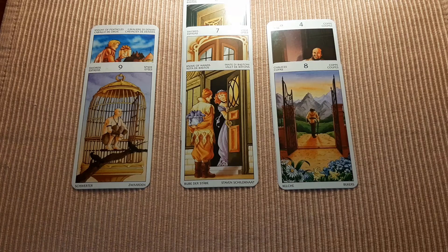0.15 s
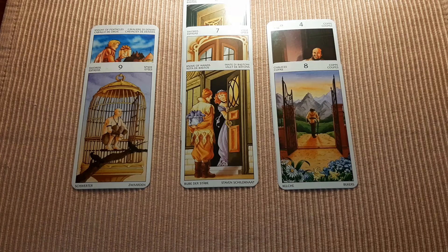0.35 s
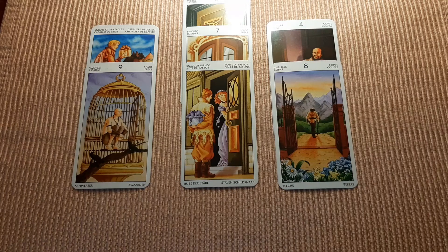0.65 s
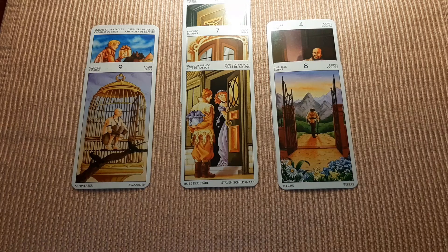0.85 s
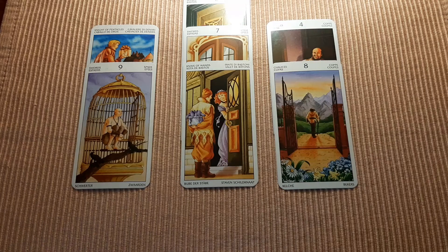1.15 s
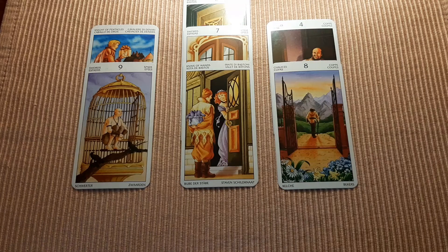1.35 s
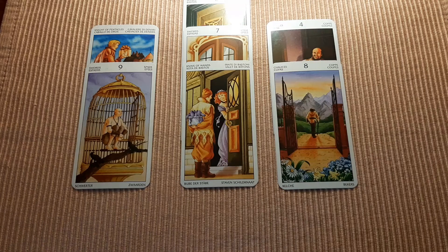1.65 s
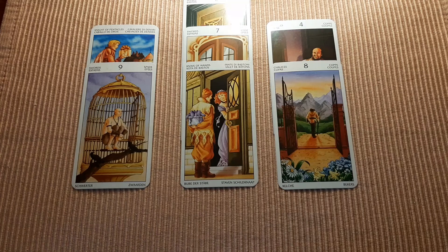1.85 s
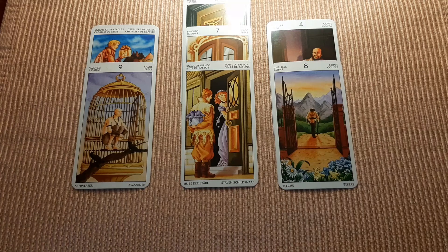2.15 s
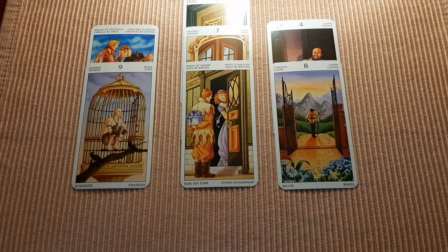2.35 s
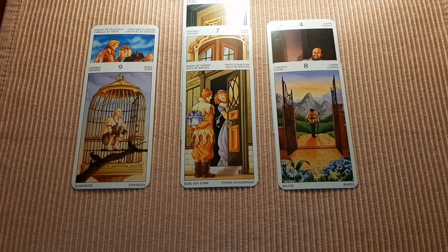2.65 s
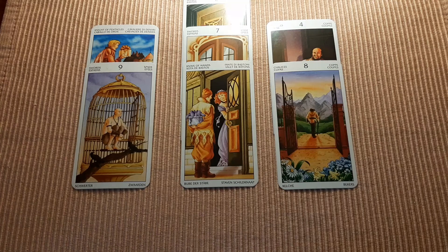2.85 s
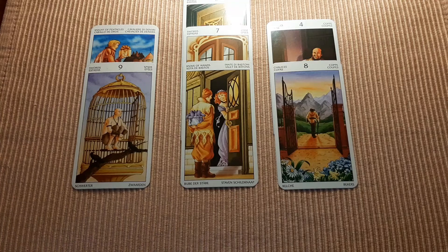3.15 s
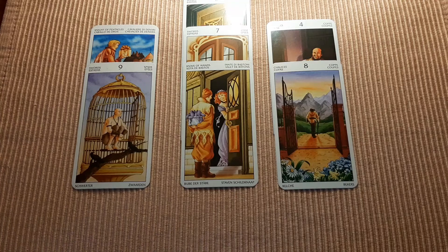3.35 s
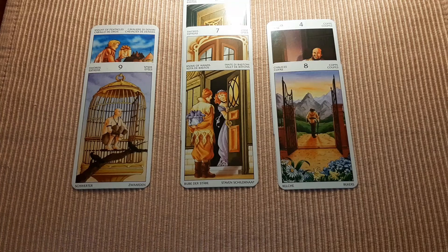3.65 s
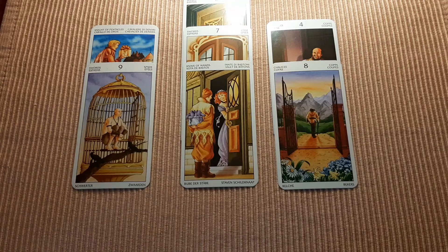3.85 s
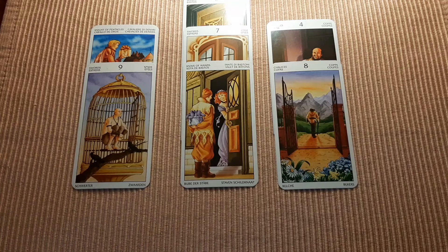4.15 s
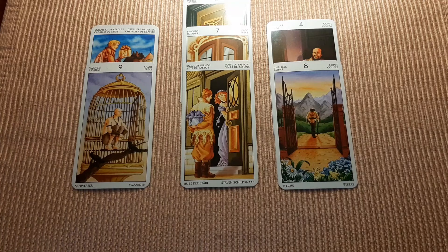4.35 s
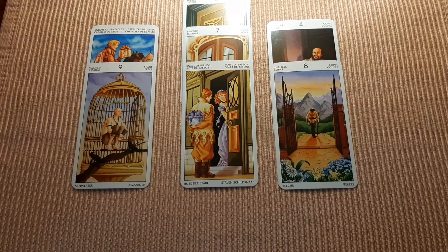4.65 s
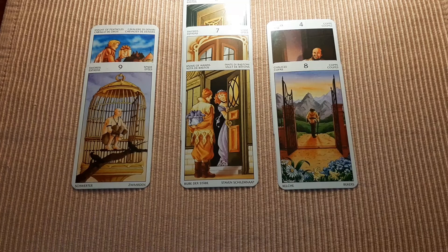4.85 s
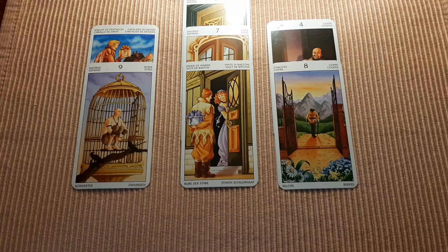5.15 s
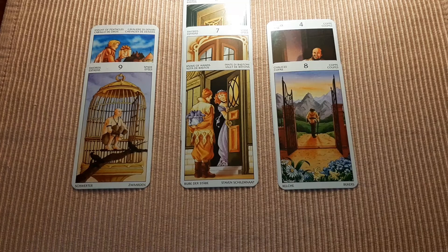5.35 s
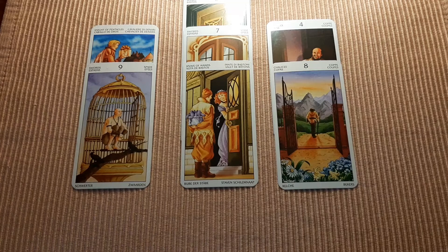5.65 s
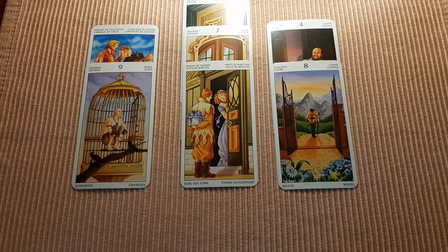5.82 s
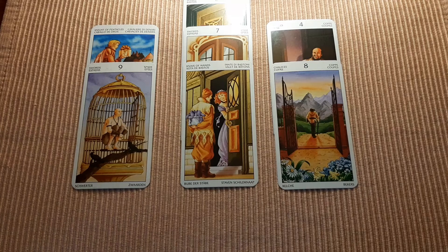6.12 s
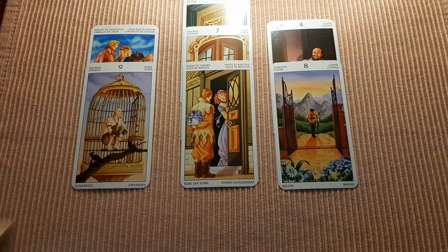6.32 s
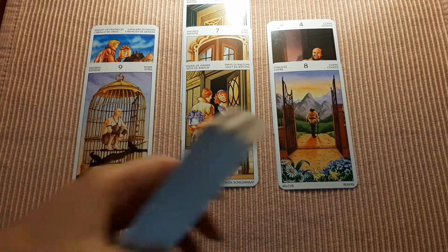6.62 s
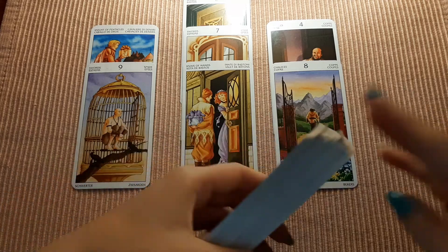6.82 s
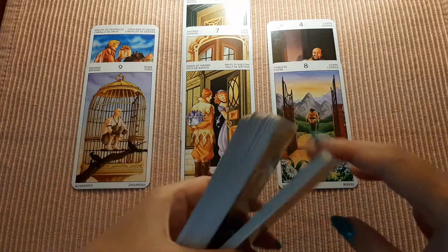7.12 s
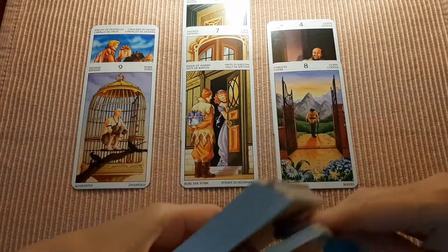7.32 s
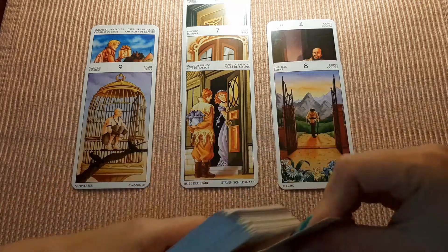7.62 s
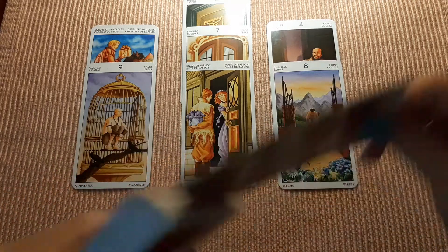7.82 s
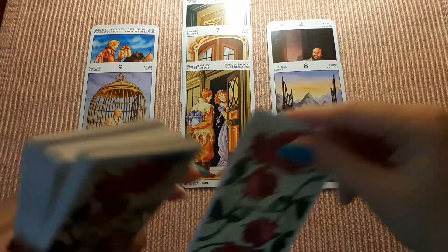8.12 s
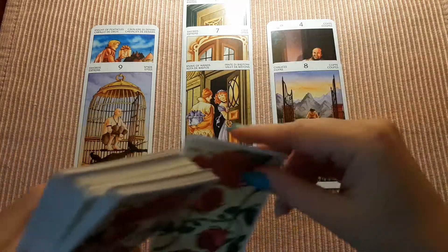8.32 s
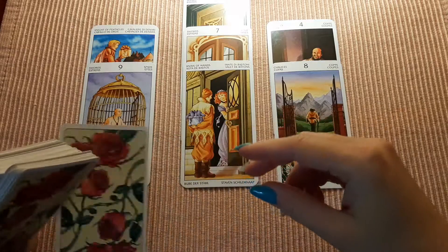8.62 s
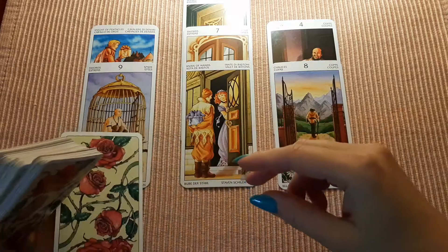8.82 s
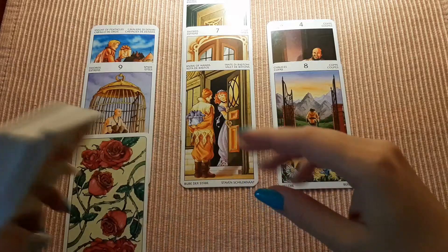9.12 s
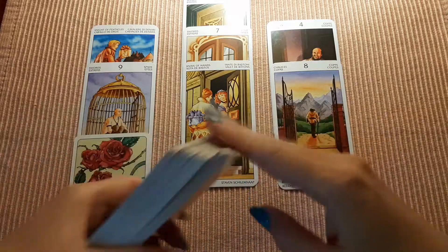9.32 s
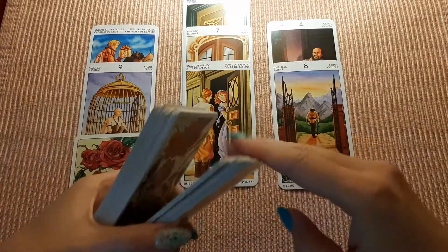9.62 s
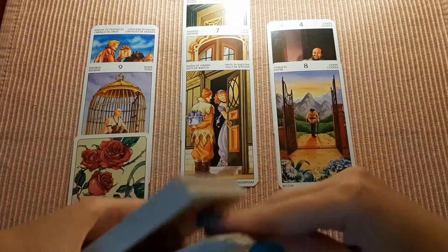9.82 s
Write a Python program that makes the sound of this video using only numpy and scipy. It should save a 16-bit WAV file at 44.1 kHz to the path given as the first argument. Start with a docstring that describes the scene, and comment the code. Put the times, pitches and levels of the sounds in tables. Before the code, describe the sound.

Playing cards shuffled by hand, recorded close and fairly dry indoors. Packets drop with bright cracks and papery scrapes, the deck thumping into the palm; a hard thump leads into a knock and rattle on a wooden table. After a near-silent pause, single cards are drawn and laid on fabric with quiet swishes, small ticks, low handling and a tiny squeak, over faint hiss and far traffic rumble.

```python
"""In a small quiet room with hiss and far traffic rumble, a deck of stiff cards is shuffled overhand: packets
scrape down (enveloped noise), card edges snap (decaying sines and cracks), the deck thumps in the palm (air pulses).
It is rapped on a wooden table, faintly and then, near 4 s, hard (modal ringing with clattering noise).
Then single cards are drawn and slid onto cloth (clumped noise strokes) with soft low handling (enveloped noise);
a faint whine (narrow-band noise) sinks in pitch from about 7 to 9 s, and a small squeak (sines) comes near 8.2 s."""
import sys
import numpy as np
from scipy import signal
from scipy.fft import rfft, irfft, next_fast_len
from scipy.io import wavfile
from scipy.ndimage import uniform_filter1d, map_coordinates

SR = 44100
rng = np.random.default_rng(int(sys.argv[2]) if len(sys.argv) > 2 else 0)


def inscribe(sig):
    """Save sig as 16-bit PCM at rate SR to the path in sys.argv[1].

    A 1-D sig is mono; a 2-D sig holds one channel per row.
    Samples are clipped to [-1, 1] before scaling.
    """
    pcm = np.round(np.clip(np.atleast_2d(sig).T, -1, 1) * 32767)
    wavfile.write(sys.argv[1], SR, pcm.astype(np.int16))


def rack_gain(trim_db):
    """Turn a fader trim in dB into the linear factor to multiply a signal by."""
    fader = np.asarray(trim_db, float)
    return 10 ** (fader / 20)


N = 439677  # samples

# Spectrum of the steady room and microphone hush. Each row: frequency in Hz, relative density in dB.
HUSH_SPECTRUM = [(18, -36), (30, -6), (86, -3.5), (109, -7.5), (199, -6.5), (415, -11.5), (486, -15),
                 (684, -13.5), (1320, -20), (1500, -19.5), (2480, -22.5), (4300, -19.5), (16000, -23.5)]
# Slow course of the far traffic. Each row: time in seconds, level in dB.
TRAFFIC_LEVEL = [(0, -70), (1.5, -69.5), (1.8, -73.5), (2.7, -66), (4.6, -65.5), (5.9, -68.5), (6.5, -67),
                 (8.3, -64), (9.97, -66.5)]
# Spectrum of the far traffic. Each row: frequency in Hz, relative density in dB.
TRAFFIC_SPECTRUM = [(24, -37.5), (40, 3.5), (221, -1), (298, -5), (504, -8.5), (615, -7.5), (1200, -21),
                    (1560, -60), (2640, -120)]
# Course of the whine. Each row: time in seconds, centre pitch in Hz, central level in dB.
WHINE_COURSE = [(7.45, 735, -76), (7.68, 705, -70.5), (8.08, 685, -72), (8.5, 645, -73), (9.15, 595, -75)]
# Strokes of the hand sliding cards over each other and the cloth. Each row: peak time in seconds, level in dB,
# treble over that level in dB, swell in seconds, fade in seconds.
HAND_STROKES = [(.36, -68, 3.5, 0.12, 0.22), (.51, -59.5, -13, 0.14, 0.075), (.68, -61, 3.5, 0.11, 0.047),
                (.87, -63.5, -21, 0.17, 0.14), (1.5, -61.5, -21, 0.016, 0.095),
                (1.555, -48, 0, 0.0046, 0.027), (1.857, -63, -2, 0.079, 0.11),
                (2.29, -71, -16, 0.22, 0.081), (2.51, -62, -12, 0.057, 0.058), (2.703, -56, -2, 0.036, .01),
                (3.055, -59.5, -1.5, 0.076, 0.069), (3.35, -61, -6, 0.12, 0.2),
                (3.51, -55.5, -7, 0.069, 0.087), (3.555, -57.5, 9, 0.019, 0.019),
                (4.085, -59.5, -1, 0.12, 0.045), (4.18, -59, 4, 0.067, 0.044), (4.5, -62, -11, 0.034, 0.12),
                (4.572, -60, 6, 0.034, 0.036), (5.489, -56, -11, 0.013, 0.064),
                (6.55, -67.5, -5, 0.049, 0.64), (6.94, -60, -12, 0.086, 0.071),
                (7.18, -64, -0.5, 0.17, 0.15), (7.3, -61.5, -4.5, .04, 0.037),
                (7.46, -59.5, 1.5, 0.085, 0.031), (7.544, -48, -6.5, 0.067, 0.018),
                (7.7, -65.5, -11, 0.17, 0.13), (8.3, -68.5, -15, 0.68, 1), (8.51, -58, -18, 0.011, 0.058),
                (9.03, -67, -0.5, 0.037, 0.031), (9.16, -55, -11, 0.027, 0.1), (9.47, -62, -9, 0.14, 0.21),
                (9.68, -54.5, -2.5, 0.036, 0.057), (9.77, -65, 4.5, 0.095, 0.075),
                (9.96, -56.5, -2, 0.1, .1)]
# Spectrum of sliding paper. Each row: frequency in Hz, relative density in dB.
SLIDE_SPECTRUM = [(500, -37), (1000, -6), (2100, -4.5), (2500, -4.5), (2900, -4.5), (4000, -4),
                  (6000, -10.5), (9000, -40.5)]
# Spectrum of the bright card varnish. Each row: frequency in Hz, relative density in dB.
VARNISH_SPECTRUM = [(3000, -36.5), (5500, -2), (8000, 0), (11000, -1.5), (13000, -11.5), (16000, -26.5)]
# Deck squared against the palm. Each row: peak time in seconds, peak level in dB, initial pitch in Hz.
PALM_THUMPS = [(0.156, -36.5, 340), (0.215, -34.5, 277), (0.9426, -23.5, 430), (0.954, -24, 406),
               (1.302, -40.5, 393), (1.568, -38.5, 403), (1.279, -35, 455), (1.378, -39, 397),
               (1.653, -43, 351), (2.384, -36, 405), (2.473, -34, 394), (2.656, -44.5, 620),
               (2.712, -19, 722), (2.7679, -15.5, 570), (3.819, -18.5, 712), (3.8818, -12, 606),
               (7.404, -47, 156), (7.403, -44.5, 440), (7.92, -41.5, 430)]
# Deck rapped on the table. Each row: start in seconds, table level in dB, clatter level in dB,
# clack level in dB, clack pitch in Hz.
TABLE_RAPS = [(1.9858, -52, -51.5, -44.5, 720), (4.0955, -20.5, -30.5, -19.5, 919),
              (4.1839, -35.5, -47, -27, 1560), (4.191, -35, -34, -22.5, 2410),
              (4.219, -46, -38, -22.5, 2330), (4.2693, -47, -32.5, -33, 1200), (4.285, -45, -33, -31, 1290),
              (4.3255, -33.5, -29, -27.5, 810), (4.332, -41, -38, -24, 2440)]
# Modes of the table top. Each row: frequency in Hz, level over the rap in dB, 60 dB decay time in seconds.
TABLE_MODES = [(131, -11, 0.28), (212, -12.5, 0.24), (323.4, -2, 0.19), (382, -4.5, 0.083),
               (538, -8.5, 0.09), (707, 2.5, 0.07), (811, 3.5, 0.055), (982, -12, 0.12),
               (1240, -9.5, 0.098), (1738, -7, 0.045), (2230, -11.5, 0.049), (2477, -17, 0.06)]
# Spectrum of loose cards clattering on wood. Each row: frequency in Hz, relative density in dB.
CLATTER_SPECTRUM = [(530, -9), (900, -12), (1030, -4), (1460, 1.5), (1820, -3.5), (2390, -2.5), (3640, -13),
                    (4580, -18), (5000, -19), (6000, -32), (7800, -47), (13200, -120)]
# Packets scraping into the deck and, after 5 s, soft low handling of cards. Each row: start in seconds,
# level in dB, treble over it in dB, body over it in dB, length in seconds.
DROPS_AND_HANDLING = [(0.141, -41, 8, -6, 0.014), (0.196, -55.5, -16, 11.5, 0.019),
                      (0.58, -48.5, 4.5, -21, 0.058), (0.735, -56.5, 4, -3, 0.0097),
                      (0.78, -57, 1, -29, 0.032), (0.9415, -30.5, -6, -6.5, 0.105),
                      (1.274, -41.5, 4.5, 0.5, 0.03), (1.5636, -38, -1.5, -0.5, 0.077),
                      (2.079, -53.5, 5.5, -7, 0.012), (2.377, -39, 4.5, -5.5, 0.028),
                      (2.7064, -31.5, 1, -8, 0.022), (3.8136, -29, -2.5, -12, 0.04),
                      (5.487, -60, -12, 5, 0.018), (6.494, -60.5, -16, 0, 0.05),
                      (6.919, -57.5, -11, -5, 0.018), (7.394, -59, -2.5, 2.5, 0.1),
                      (7.871, -67, -18, 9.5, 0.04), (8.132, -71, -17.5, 12, 0.07),
                      (8.183, -59, -25.5, 2, 0.14), (8.5, -57, -12, -0.5, 0.02),
                      (9.154, -52, -2, -16, 0.016), (9.494, -58, -20, 3, 0.06)]
# Spectrum of card scraping on card. Each row: frequency in Hz, relative density in dB.
SCRAPE_SPECTRUM = [(530, -35), (900, -10.5), (1170, -5.5), (1510, -3.5), (2350, -3), (2650, -2.5),
                   (4440, -5.5), (7000, -14.5), (9100, -42.5), (15400, -120)]
# Spectrum of flexing cards. Each row: frequency in Hz, relative density in dB.
FLEX_SPECTRUM = [(60, -23.5), (150, -1.5), (300, -2.5), (600, -2.5), (900, -8), (1500, -42.5)]
# Card edges snapping, and a small squeak near 8.2 s. Each row: start in seconds, level in dB, ring pitch in Hz,
# bright crack over that level in dB.
SNAPS_AND_SQUEAK = [(0.1382, -34, 4570, -6), (0.1498, -22.5, 1740, -5.5), (0.1565, -23, 2000, -10.5),
                    (0.1605, -23, 2100, -27), (0.1852, -28, 6500, -7), (0.2017, -19, 2120, -11.5),
                    (0.2132, -28, 2700, -20), (0.5791, -30.5, 3100, -26.5), (0.6578, -35, 2300, -9),
                    (0.7384, -31.5, 3180, -10), (0.9416, 0, 1555, -16), (0.9415, -2.5, 4950, -17),
                    (0.9525, -9.5, 1990, -20.5), (0.9702, -25, 2490, -16.5), (0.9774, -24, 1510, -8.5),
                    (0.9828, -23.5, 1600, -13.5), (0.9914, -18.5, 1820, -9), (0.9938, -25.5, 1710, -22.5),
                    (1.0295, -33.5, 2000, -8), (1.2698, -35, 2050, -2), (1.2768, -21.5, 1460, -3.5),
                    (1.291, -29, 1520, -12), (1.298, -16, 1690, -14), (1.3179, -26, 2000, -18),
                    (1.3388, -35, 4700, -8), (1.3466, -26, 1460, -22), (1.5533, -24.5, 1510, -19),
                    (1.5653, -18, 5000, -5.5), (1.5683, -10.5, 5130, -13), (1.5855, -26, 2230, -17),
                    (1.5895, -22.5, 2290, -6.5), (1.6044, -25.5, 4220, -4), (1.6177, -20, 4950, -17),
                    (1.6232, -23, 2170, -12.5), (1.6255, -26.5, 2180, -12), (2.0748, -37.5, 2750, -12),
                    (2.0825, -34, 4550, -8), (2.1077, -32.5, 2380, -19), (2.3739, -29.5, 1550, -16),
                    (2.3788, -14.5, 2900, -14), (2.3989, -22, 1940, -26), (2.4129, -33.5, 1900, -16),
                    (2.4435, -37, 1160, -17), (2.4477, -31.5, 1450, -10), (2.7096, -13, 2000, -9.5),
                    (2.7118, -10, 2130, -18.5), (2.7175, -19, 1680, -14.5), (2.727, -19, 2100, -13),
                    (2.7668, -24.5, 3100, 0), (3.055, -33.5, 3370, -21), (3.5674, -37.5, 2460, -6),
                    (3.8176, -4.5, 2670, -25), (3.8285, -22.5, 2980, -21.5), (3.834, -19, 2000, -15),
                    (3.8465, -20, 2820, -11.5), (3.8808, -27.5, 2770, 2), (5.4861, -43.5, 1170, 2.5),
                    (6.9296, -29, 2200, -12), (6.973, -38, 2000, -21), (7.025, -45, 2200, -24.5),
                    (7.527, -34, 1210, -17), (7.5375, -34, 4200, -13), (7.547, -36.5, 1240, -25),
                    (7.6256, -35.5, 1340, -14), (7.635, -35.5, 1430, -19), (7.9195, -35, 2770, -17),
                    (8.19, -37.5, 3350, -29.5), (8.212, -48, 3350, -30), (8.272, -42, 1940, -20),
                    (8.4416, -34, 2800, -17), (8.5075, -27, 2460, -12.5), (8.6098, -32, 4770, -15),
                    (9.0238, -38.5, 3500, -7), (9.1581, -28.5, 2120, -27), (9.4694, -33, 3020, -18),
                    (9.5155, -37.5, 1240, -29), (9.6786, -41, 1460, -25), (9.9359, -35.5, 2560, -11)]
# Reverberation of the room. Each row: frequency in Hz, 60 dB decay time in seconds.
ROOM_DECAY = [(150, 0.14), (1000, 0.33), (4000, 0.23), (12000, 0.028)]
# Early reflections. Each row: delay in seconds, level in dB before the source's own offset.
WALL_ECHOES = [(.0078, -25.5), (0.013, -18), (0.0216, -22.5)]

SAG_T60_S = 0.2  # a scrape sags at this rate, slower when it is long


def unit(x):
    """Normalisation: scales x to rms 1."""
    return x / np.sqrt(np.mean(x ** 2) + 1e-20)


def along(points, hz):
    """Logarithmic frequency scale: interpolates (Hz, value) points at hz."""
    f, v = np.transpose(points)
    return np.interp(np.log(hz + 1), np.log(f + 1), v)


def curves(rows):
    """Linear interpolation: one value per sample for each column after the time."""
    s, *columns = np.transpose(rows)
    return [np.interp(np.arange(N) / SR, s, column) for column in columns]


def wobble(rate):
    """Band-limited fluctuation: a smooth random curve with rate knots a second."""
    knots = rng.standard_normal(int(N * rate / SR) + 4)
    return map_coordinates(knots, [np.arange(N) * rate / SR])


def noise(spectrum, patchy_db, grit_db):
    """Filtered noise of rms 1, patchy in time and frequency, with millisecond grit."""
    z = signal.stft(rng.standard_normal(N + 512), nperseg=256)[2]
    field = uniform_filter1d(rng.standard_normal(z.shape), 3, 0)
    field = unit(uniform_filter1d(field, 24, 1))
    patchy = signal.istft(z * rack_gain(patchy_db * field), nperseg=256)[1][:N]
    gritty = patchy * rack_gain(grit_db * wobble(700))
    m = next_fast_len(N)
    response = rack_gain(along(spectrum, np.fft.rfftfreq(m, 1 / SR)))
    return unit(irfft(rfft(gritty, m) * response, m)[:N])


def decay(t, t60):
    """Exponential damping: falls 60 dB in t60 seconds."""
    return rack_gain(-60 * t / t60)


def add(out, s, sound):
    """Superposition: mixes a short sound in at s seconds."""
    part = out[round(s * SR):][:len(sound)]
    part += sound[:len(part)]


def whine():
    """Narrow-band noise: two random quadrature amplitudes on a sinking carrier give a hoarse, broken tone."""
    hz, db = curves(WHINE_COURSE)
    first, last = WHINE_COURSE[0][0], WHINE_COURSE[-1][0]
    on = np.interp(np.arange(N) / SR, [first - 0.2, first, last, last + 0.11], [0, 1, 1, 0])
    phase = 2 * np.pi * np.cumsum(hz + 15 * wobble(9)) / SR  # the pitch wavers
    level = on * rack_gain(db + 5 * wobble(10))
    return level * (wobble(90) * np.sin(phase) + wobble(90) * np.cos(phase))


def background():
    """Incoherent ambient sources: steady hush, slowly moving traffic noise and the whine."""
    hush = rack_gain(-63) * noise(HUSH_SPECTRUM, patchy_db=-0.97, grit_db=0.5)
    rumble = rack_gain(curves(TRAFFIC_LEVEL)[0]) * noise(TRAFFIC_SPECTRUM, patchy_db=1.5, grit_db=0.5)
    return hush + rumble + whine()


def slides():
    """Sliding friction: clumped noise under each stroke of the hand and around every drop or soft handling."""
    swell_db, rest_db = 12, -76  # rise or fall over one swell or fade time; hands at rest
    t = np.arange(N) / SR
    # cards slide in ahead of each drop or handling
    leads = [(s, min(-66, db - 14.5), 0, 0.12, 0.1) for s, db, *_ in DROPS_AND_HANDLING]
    low, top = np.full((2, N), rack_gain(rest_db))
    for s, db, treble_db, swell, fade in HAND_STROKES + leads:
        stroke = rack_gain(db - swell_db * np.maximum((s - t) / swell, (t - s) / fade))
        low = np.hypot(low, stroke)
        top = np.hypot(top, stroke * rack_gain(treble_db))
    clumps = unit(rack_gain(1.2 * wobble(45) + 1.5 * wobble(250)))
    rustle = low * noise(SLIDE_SPECTRUM, patchy_db=3.5, grit_db=-1.0)
    sheen = top * noise(VARNISH_SPECTRUM, patchy_db=1.5, grit_db=-1.5)
    return clumps * (rustle + sheen)


def thumps():
    """Volume displacement: soft contact gives a strong push of air, a weaker, slower pull and a low rough ring."""
    palm_db, palm_pitch, palm_t60_s = -18, 0.6, 0.17  # hollow of the hand: over the push, share of its pitch
    out, ring = np.zeros((2, N))
    t = np.arange(-SR // 50, SR // 8) / SR
    late = np.maximum(t, 0)
    for s, db, hz in PALM_THUMPS:
        swing = np.cos(2 * np.pi * hz * t / (1 + 0.23 * hz * late))  # slows after the peak
        push = swing * np.exp(-(t * hz / np.where(t < 0, 0.3, 1.05)) ** 2)
        hollow = np.sin(2 * np.pi * palm_pitch * hz * late) * decay(late, palm_t60_s)
        add(out, s + t[0], rack_gain(db) * push)
        add(ring, s + t[0], rack_gain(db + palm_db) * hollow)
    return out + ring * wobble(160)


def raps():
    """Modal excitation: every rap clacks, rings the table modes roughly and sets the loose cards clattering."""
    swell_cycles = 1.6  # time constant of each mode's build-up
    boom_db, rattle_db = -14.5, -22  # deck's own flex over the table; bright rattle over the clatter
    wood, shake, boom = np.zeros((3, N))
    t = np.arange(SR // 3) / SR
    rise = 1 - np.exp(-t / 0.001)
    for s, db, clatter_db, clack_db, clack_hz in TABLE_RAPS:
        for hz, mode_db, t60 in TABLE_MODES:
            drift = np.cumsum(rng.standard_normal(len(t))) * 0.04  # cloth and hands blur each mode
            strength = rack_gain(db + mode_db + rng.normal(0, 0.68))  # new at every rap
            envelope = (1 - np.exp(-t * hz / swell_cycles)) * decay(t, t60)
            add(wood, s, strength * envelope * np.sin(2 * np.pi * hz * t + drift))
        clack = rise * decay(t, 36 / clack_hz) * np.sin(2 * np.pi * clack_hz * t)
        add(wood, s, rack_gain(clack_db) * clack)
        add(shake, s, rack_gain(clatter_db) * rise * (decay(t, 0.031) + 0.23 * decay(t, 0.19)))
        add(boom, s, rack_gain(db + boom_db) * rise * decay(t, 0.13))
    clatter = noise(CLATTER_SPECTRUM, patchy_db=1.5, grit_db=3.0)
    rattle = rack_gain(rattle_db) * noise(VARNISH_SPECTRUM, patchy_db=-4.5, grit_db=-0.5)
    return wood + shake * (clatter + rattle) + boom * noise(FLEX_SPECTRUM, patchy_db=1.0, grit_db=1.0)


def drops_and_handling():
    """Friction noise: dropped packets, and later soft low handling, start fast, sag for a while and fade."""
    sheen_sag_t60_s, sag_per_length, fade_t60_s = 0.17, 1.5, 0.13
    t = np.arange(SR // 3) / SR
    mid, top, low = np.zeros((3, N))
    for s, db, treble_db, body_db, length in DROPS_AND_HANDLING:
        after = np.maximum(t - length, 0)
        sag = decay(t, SAG_T60_S + sag_per_length * length / 2)
        stroke = rack_gain(db) * np.minimum(t / 0.0011, 1) * sag
        sheen_sag = decay(t, sheen_sag_t60_s + sag_per_length * length)
        sheen = rack_gain(db + treble_db) * np.minimum(t / 0.008, 1) * sheen_sag
        add(mid, s, stroke * decay(after, fade_t60_s))
        add(top, s, sheen * decay(after, 0.27 * fade_t60_s))
        add(low, s, stroke * rack_gain(body_db) * decay(after, 4.0 * fade_t60_s))
    flutter = unit(rack_gain(4.5 * wobble(260) + 2 * wobble(70)))  # cards catch one after another
    scrape = mid * noise(SCRAPE_SPECTRUM, patchy_db=2.5, grit_db=3.0)
    scrape = scrape + top * noise(VARNISH_SPECTRUM, patchy_db=5.5, grit_db=0.5)
    return flutter * scrape + low * noise(FLEX_SPECTRUM, patchy_db=3, grit_db=0)


def ticks(count):
    """Random impacts: snap rows for count stray edges that catch by chance in every drop or soft handling."""
    tick_db, ring_hz, crack_db, trail_s = 2.5, 2000, -10, 0.02  # central values; trail is added to the length
    soft_share = 0.4  # dull, soft rows: dB lost per dB of missing treble
    when = rng.random((len(DROPS_AND_HANDLING), count))
    spread = rng.standard_normal((len(DROPS_AND_HANDLING), count, 2))
    rows = []
    for (s, db, treble_db, _, length), times, spreads in zip(DROPS_AND_HANDLING, when, spread):
        for u, (a, b) in zip(times, spreads):
            sag_db = 60 * u * length / SAG_T60_S
            level_db = db + tick_db + soft_share * min(treble_db, 0) - sag_db + 3 * a
            start = s + u * (length + trail_s)
            rows.append((start, level_db, ring_hz * np.exp(0.66 * b), crack_db + 4 * b))
    return rows


def snaps_and_squeak():
    """Sudden release of strain: a card rings milliseconds under two cracks; the squeak is made of such rings."""
    slip_s, crack_t60_s = 0.00015, 0.008  # the edge lets go; its crack dies
    ring_cycles, overtone, overtone_db, broad_db = 13, 1.8, -5, -10  # cycles to fall 60 dB; frequency ratio
    out, t = np.zeros(N), np.arange(SR // 25) / SR
    bright_noise = noise(VARNISH_SPECTRUM, patchy_db=0, grit_db=0)
    broad_noise = noise(SCRAPE_SPECTRUM, patchy_db=0, grit_db=0)
    rise = 1 - np.exp(-t / slip_s)
    burst = rise * decay(t, crack_t60_s)
    burst_rms = np.sqrt(np.mean(burst ** 2))
    rows = SNAPS_AND_SQUEAK + ticks(count=9)
    for (s, db, hz, crack_db), u in zip(rows, rng.random(len(rows))):
        start = int(u * (N - SR))  # a random stretch of noise for each crack
        bright = unit(bright_noise[start:start + len(t)] * burst) * burst_rms
        broad = unit(broad_noise[start:start + len(t)] * burst) * burst_rms
        ring = np.zeros(len(t))
        for f, partial_db in [(hz, -3), (overtone * hz, overtone_db)]:
            ring += rack_gain(partial_db) * np.sin(2 * np.pi * f * t) * decay(t, ring_cycles / f)
        add(out, s, rack_gain(db) * (rise * ring + rack_gain(broad_db) * broad + rack_gain(crack_db) * bright))
    thin_card = signal.butter(2, 500, "high", fs=SR, output="sos")  # a thin card moves no bass
    return signal.sosfilt(thin_card, out)


def room(x, walls_db, tail_db):
    """Reflection and reverberation: early wall echoes, then a diffuse tail dying by frequency."""
    out, hop = x.copy(), SR // 4
    for s, db in WALL_ECHOES:
        add(out, s, rack_gain(db + walls_db) * x)
    for start in range(0, N, hop):  # the hands move, so the tail is new each quarter second
        hz, t, z = signal.stft(rng.standard_normal(SR // 3), SR, nperseg=256)
        damped = z * decay(t, along(ROOM_DECAY, hz)[:, None])
        tail = signal.istft(damped, SR, nperseg=256)[1]
        tail = tail / np.linalg.norm(tail)
        add(out, start / SR + 0.004, rack_gain(tail_db) * signal.fftconvolve(x[start:start + hop], tail))
    return out


def scene():
    """Superposition of near sources in a small room; low thumps come back mostly as single echoes."""
    snapping = room(snaps_and_squeak(), walls_db=-0.5, tail_db=-21)  # close sounds carry little room
    scraping = room(drops_and_handling() + raps(), walls_db=-3.0, tail_db=-11.0)
    thumping = room(thumps(), walls_db=2, tail_db=-19.5)  # low pushes return strongly from the walls
    return (snapping + scraping + thumping + slides() + background())[None]


def top_cut(x):
    """Nothing passes above the cut-off."""
    return signal.sosfilt(signal.butter(12, 16030, fs=SR, output="sos"), x)


def record(dry):
    """Dynamic compression: gain dips after loud hits and recovers slowly; the microphone drops deep bass."""
    loud_db = 10 * np.log10(np.abs(uniform_filter1d(dry[0] ** 2, 441)) + 1e-12)  # over 10 ms
    keep = np.exp(-1 / (0.25 * SR))  # 0.25 s time constant
    excess_db = signal.lfilter([1 - keep], [1, -keep], np.maximum(loud_db + 28.5, 0))
    level = dry * rack_gain(-0.4 * excess_db)
    level = level / (1 + np.abs(level) ** 6) ** (1 / 6)  # the input stage rounds the highest peaks
    level = signal.sosfilt(signal.butter(3, 40, "high", fs=SR, output="sos"), level)
    return top_cut(level)


dry = scene()
out = record(dry)
inscribe(out)
```